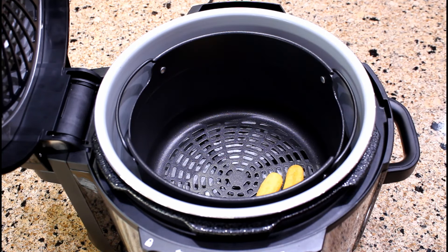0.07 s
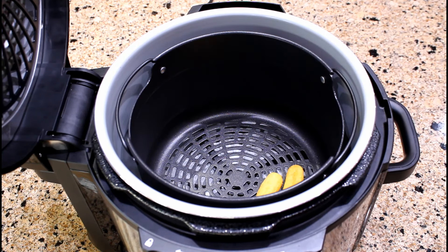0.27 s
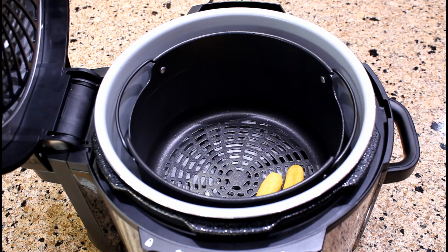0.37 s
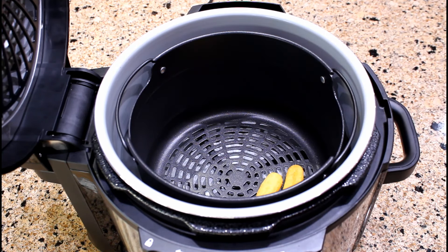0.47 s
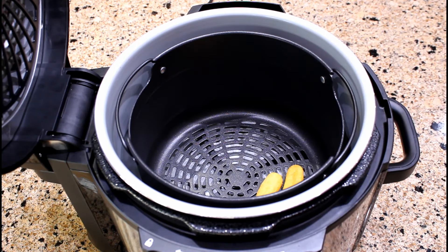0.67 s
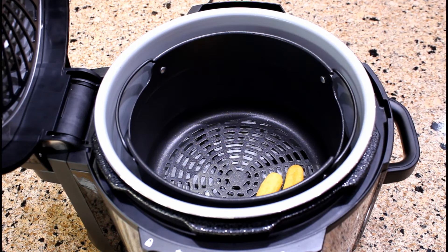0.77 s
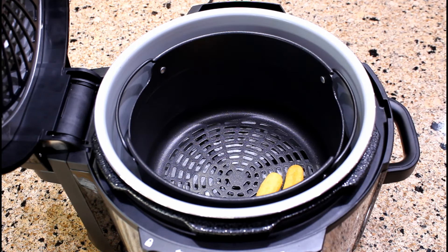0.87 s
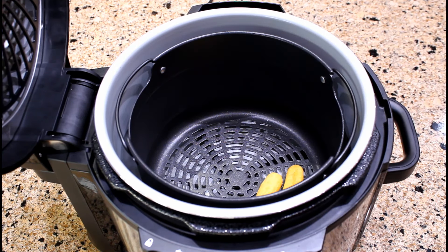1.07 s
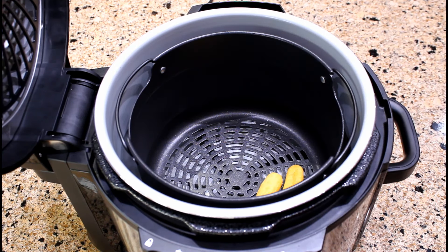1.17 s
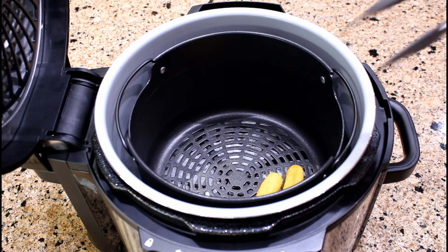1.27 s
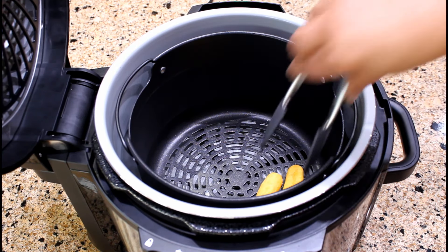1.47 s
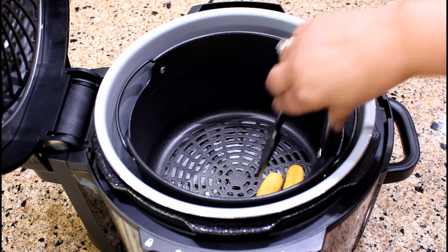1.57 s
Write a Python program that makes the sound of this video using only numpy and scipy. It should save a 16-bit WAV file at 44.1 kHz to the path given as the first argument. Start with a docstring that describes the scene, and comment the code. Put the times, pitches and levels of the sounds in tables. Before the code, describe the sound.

Dull knocks come from a hollow container handled on a kitchen counter, starting softly at 0.2 seconds and bunching from 0.4 to 0.8 seconds over low scuffing, with a brief dry rasp at 0.5. At about 0.7 seconds metal tongs clack sharply, chatter and settle. Two faint bumps follow near 1.25 seconds and a tiny tick at 1.4. Faint air and appliance hum continue throughout in the small bright room.

```python
"""Dull knocks ring a hollow body as it is handled on a kitchen counter, each one sinking in pitch.
It scuffs along the top in a stream of tiny slips, and an edge catches once with a dry rasp.
Thin metal edges tick; a hard utensil lands with a clack, chatters and settles.
A small bright room answers, over a steady bed of air and appliance hum."""
import sys
import numpy as np
from scipy import signal
from scipy.fft import rfft, irfft
from scipy.io import wavfile

SR = 44100
rng = np.random.default_rng(int(sys.argv[2]) if len(sys.argv) > 2 else 0)


def master_out(mix):
    """Clip the mix to full scale and print it as 16-bit PCM to the path in sys.argv[1]."""
    frames = np.transpose(np.atleast_2d(mix))
    ceiling = np.clip(frames, -1, 1)
    pcm = np.round(ceiling * 32767).astype(np.int16)
    wavfile.write(sys.argv[1], SR, pcm)


N = 70560

# tone of the room air: f/Hz, level/dB
AIR_EQ = [(15, -22), (25, -9.5), (37, -34), (64, -7.5), (90, -18), (103, -13), (121, -12), (146, -12),
          (176, -6), (250, -5.5), (301, -12), (326, -11), (383, -4.5), (415, -7), (488, -8), (1060, -17.5),
          (1150, -17.5), (5720, -26.5), (15000, -39)]
# partials of the appliance hum: f/Hz, rms level/dB
HUM_PARTIALS = [(119, -64), (183, -69.5), (333.8, -63), (382.2, -61), (441.4, -64), (489.9, -67)]
# slides along the counter: t/s, attack/s, hold/s, release time constant/s, level/dB
SCUFF_STROKES = [(0.173, 0.017, 0.26, 0.048, -51), (0.345, 0.13, 0.079, 0.1, -44.5),
                 (0.644, 0.028, 0.067, 0.053, -43), (0.8, 0.0093, 0.024, 0.038, -54.5),
                 (1.244, 0.027, 0.087, 0.016, -58)]
# tone of the sliding: f/Hz, level/dB
SCUFF_EQ = [(40, -30), (95, -4), (240, 3.5), (350, 4), (470, 7), (800, -7.5), (1500, -15.5), (4500, -24),
            (9000, -35), (14000, -48)]
# dull blows: t/s, level/dB, pitch/ratio, pitch overshoot/fraction, grit/dB, mode tilt/(dB per octave)
KNOCK_HITS = [(0.206, -21, 1.1, 0.018, -15, -17), (0.3848, -20, 1.0, 0.15, -14, 14),
              (0.395, -12.5, 1.0, 0.12, -24, 4), (0.426, -8.5, 1.01, 0.16, -13, -6.5),
              (0.459, -7.5, 1.03, 0.095, -12.5, 1), (0.476, -8.5, 0.99, 0.046, -14, 0),
              (0.5095, -4.5, 0.96, 0.14, -7.5, -5.5), (0.529, -6.5, 0.98, 0.02, -9, -8),
              (0.6212, -3, 1.0, 0.29, -12, -1.5), (0.631, -4, 1.0, 0.022, -10.5, 3),
              (0.65, -12.5, 1.08, 0.038, -9.5, 2), (0.682, -15.5, 0.96, 0.027, -9.5, -4.5),
              (0.7513, -3.5, 1.0, 0.1, -9, -0.5), (0.797, -8, 0.92, 0.03, -12.5, 4),
              (1.234, -21, 0.955, 0.44, 1, -5), (1.271, -24, 0.97, 0.016, -22, -9)]
# modes of the hollow body: f/Hz, level/dB, t60/s
BODY_MODES = [(100, -20, .10), (162, -16, .09), (234, -10.5, .12), (261, -12, .10), (319, -11, .09),
              (443, -1.5, .10), (499, 0.5, .085), (555, -9, .035), (642, -4.5, .065), (718, -11, .045),
              (825, -12, .055), (995, -15.5, .06)]
# tone of the grit in a knock: f/Hz, level/dB
GRIT_EQ = [(100, -16), (400, 7.5), (900, 1), (1500, -6.5), (2500, -7.5), (4000, -12), (7000, -23.5),
           (11000, -26), (15000, -73)]
# light metal touches: t/s, level/dB, centre f/Hz, bandwidth/Hz, t60/s
TICK_HITS = [(0.2300, -26.5, 5700, 4670, 0.033), (0.725, -22.5, 10400, 3690, 0.0072),
             (0.7314, -31, 8800, 5100, .008), (0.7946, -29, 10200, 2600, 0.007),
             (1.383, -33, 6200, 3000, .008)]
# tone of the catching edge: f/Hz, level/dB
RASP_EQ = [(500, -7), (2500, -16), (3600, 2), (4300, -10), (5000, 5.5), (5900, -5.5), (8500, -4),
           (11000, -20), (14000, -40)]
# the utensil lands, chatters and drops back: t/s, level/dB, noise tilt/(dB per octave)
CLACK_HITS = [(0.7253, -6, -4), (0.7297, -12.5, 3), (0.7338, -11, 2.5), (0.7985, -16, 0.5)]
# modes of the utensil: f/Hz, level/dB, t60/s
UTENSIL_MODES = [(994, -6, .08), (1072, -7, .06), (1976, -8, .08), (2072, -5, .1), (2219, 0, .13),
                 (2363, 0, .10), (2500, -6, .1), (2982, -10, .12), (4102, -12, .1), (4364, -12, .28),
                 (4829, -17, .2), (7391, -10, .06)]
# tone of its crack and clatter: f/Hz, level/dB
CRACK_EQ = [(40, -38), (150, -10), (600, -3), (1000, 3), (1550, -0.5), (2250, 5), (3200, -2), (4300, 0.5),
            (5700, -11), (7700, -5.5), (10500, -15.5), (13000, -40), (15000, -36)]

ROOM_GAP_S, ROOM_T60_LOW_S, ROOM_T60_HIGH_S = 0.007, 0.4, 0.25
SCUFF_WET_DB, KNOCK_WET_DB, TICK_WET_DB, CLACK_WET_DB = 0.5, -7.5, -4.5, -1  # reverb sends
AIR_DB, SLIP_SPREAD_DB = -53.5, 2
KNOCK_ATTACK_S, KNOCK_RELAX_S, KNOCK_LOW_CUT_HZ = 0.0012, 0.0077, 103
RASP_START_S, RASP_ATTACK_S, RASP_DECAY_S, RASP_DB = 0.513, 0.0042, 0.0071, -20
CLATTER_DB, RING_DB = -4, -7
SOFT_TOP_HZ, TOP_HZ = 13060, 15000


def undb(db):
    """Decibels to gain."""
    return 10 ** (np.asarray(db) / 20)


def unit(x):
    """Scale to unit energy."""
    return x / np.sqrt(np.sum(x ** 2))


def fade(t60):
    """Exponential decay of 60 dB in t60 seconds."""
    return np.exp(-np.log(1000) * np.arange(N) / SR / t60)


def delay(x, s):
    """Start a sound s seconds later."""
    return np.concatenate([np.zeros(int(s * SR)), x])[:N]


def burst(t60):
    """A fading burst of noise with unit energy."""
    return unit(rng.standard_normal(N) * fade(t60))


def eq(x, points, tilt_db=0):
    """Minimum-phase EQ through (f/Hz, level/dB) points, tilted by tilt_db per octave."""
    hz, db = np.array(points).T
    octave = np.log2(np.maximum(np.arange(N + 1) * SR / (2 * N), 1))
    curve_db = np.interp(octave, np.log2(hz), db + tilt_db * np.log2(hz / hz[-1]))
    cepstrum = irfft(np.log(undb(curve_db)))
    cepstrum[1:N] *= 2  # fold onto positive time: no pre-ring
    cepstrum[N + 1:] = 0
    return irfft(rfft(x, 2 * N) * np.exp(rfft(cepstrum)))[:N]


def room_tone():
    """The bed: steady room air and the slightly wavering hum of an appliance."""
    t = np.arange(N) / SR
    out = undb(AIR_DB) * unit(eq(rng.standard_normal(N), AIR_EQ)) * np.sqrt(N)
    for hz, db in HUM_PARTIALS:
        waver = 2.8 * np.cumsum(rng.standard_normal(N)) / np.sqrt(SR)
        out += undb(db) * np.sqrt(2) * np.sin(2 * np.pi * (hz * t + rng.random()) + waver)
    return out


def slips(per_s):
    """Friction grains: tiny random impulses of uneven size."""
    onsets = rng.random(N) < per_s / SR
    return onsets * rng.choice([-1, 1], N) * undb(SLIP_SPREAD_DB * rng.standard_normal(N))


def scuffs():
    """Sliding: dense, uneven slips that rumble in the body and rustle on top."""
    t = np.arange(N) / SR
    envelope = np.zeros(N)
    for start, attack, hold, release, db in SCUFF_STROKES:
        rise = np.clip((t - start) / attack, 0, 1)
        fall = np.exp(-np.maximum(t - start - attack - hold, 0) / release)
        envelope += undb(db) * rise * fall
    friction = eq(slips(per_s=600), SCUFF_EQ)
    return envelope * unit(kitchen(friction, SCUFF_WET_DB)) * np.sqrt(N)


def room_tail():
    """The room's diffuse answer to a click; its treble dies sooner."""
    noise = rng.standard_normal(N)
    low = signal.sosfilt(signal.butter(2, 4500, fs=SR, output="sos"), noise)
    high = signal.sosfilt(signal.butter(2, 4500, "high", fs=SR, output="sos"), noise)
    tail = unit(low * fade(ROOM_T60_LOW_S) - undb(-3) * high * fade(ROOM_T60_HIGH_S))
    return delay(tail, ROOM_GAP_S)


def kitchen(x, wet_db):
    """The dry sound plus the room's reverb."""
    return x + undb(wet_db) * signal.fftconvolve(x, room_tail())[:N]


def ring(modes, detune, pitch=1, overshoot=0, tilt_db=0):
    """Damped modes of alternating sign; with overshoot, contact stiffens them so they start sharp."""
    t = np.arange(N) / SR
    glide = pitch * (t + overshoot * KNOCK_RELAX_S * (1 - np.exp(-t / KNOCK_RELAX_S)))
    out = np.zeros(N)
    for k, (hz, db, t60) in enumerate(modes):
        gain = (-1) ** k * undb(db + tilt_db * np.log2(hz))
        detuned_hz = hz * (1 + detune * rng.standard_normal())
        out += gain * fade(t60) * np.sin(2 * np.pi * detuned_hz * glide)
    return unit(out)


def knocks():
    """Soft blows ring the hollow body, with a little grit; the deep bass is cut away."""
    out = np.zeros(N)
    attack = 1 - np.exp(-np.arange(N) / SR / KNOCK_ATTACK_S)
    for start, db, pitch, overshoot, grit_db, tilt_db in KNOCK_HITS:
        grit = unit(eq(burst(t60=0.098), GRIT_EQ))
        body = ring(BODY_MODES, detune=0.004, pitch=pitch, overshoot=overshoot, tilt_db=tilt_db)
        blow = attack * (body + undb(grit_db) * grit)
        out += undb(db) * delay(unit(kitchen(blow, KNOCK_WET_DB)), start)
    return signal.sosfilt(signal.butter(2, KNOCK_LOW_CUT_HZ, "high", fs=SR, output="sos"), out)


def ticks():
    """Thin metal edges touch: tiny, high clicks with a little room on them."""
    out = np.zeros(N)
    for start, db, hz, width, t60 in TICK_HITS:
        band = signal.butter(3, [hz - width / 2, hz + width / 2], "band", fs=SR, output="sos")
        click = burst(t60) + undb(TICK_WET_DB) * room_tail()
        out += undb(db) * delay(unit(signal.sosfilt(band, click + 1e-18)), start)
    return out


def rasp():
    """An edge catches and scrapes: a quickly fading run of bright slips."""
    t = np.arange(N) / SR
    envelope = np.minimum(t / RASP_ATTACK_S, 1) * np.exp(-t / RASP_DECAY_S)
    scrape = eq(slips(per_s=2300) * envelope, RASP_EQ)
    return undb(RASP_DB) * delay(unit(kitchen(scrape, SCUFF_WET_DB)), RASP_START_S)


def clacks():
    """The utensil hits hard: a short crack, a dense clatter and a room tail under a clearer ring."""
    out = np.zeros(N)
    for start, db, tilt_db in CLACK_HITS:
        crack = burst(t60=0.015)
        clatter = undb(CLATTER_DB) * burst(t60=0.064)  # many close, short modes blur into noise
        tail = undb(CLACK_WET_DB) * room_tail()
        crunch = unit(eq(crack + clatter + tail, CRACK_EQ, tilt_db))
        tone = unit(kitchen(ring(UTENSIL_MODES, detune=0.0012), CLACK_WET_DB))
        out += undb(db) * delay(crunch + undb(RING_DB) * tone, start)
    return out


def scene():
    """Mono mix: the hits, the friction and the bed."""
    return (knocks() + clacks() + ticks() + scuffs() + rasp() + room_tone())[None]


def record(dry):
    """The microphone softens the highest treble and the recorder cuts the top."""
    soft = signal.sosfilt(signal.butter(4, SOFT_TOP_HZ, fs=SR, output="sos"), dry)
    return signal.sosfilt(signal.ellip(10, .2, 80, TOP_HZ, fs=SR, output="sos"), soft)


dry = scene()
out = record(dry)
master_out(out)
```